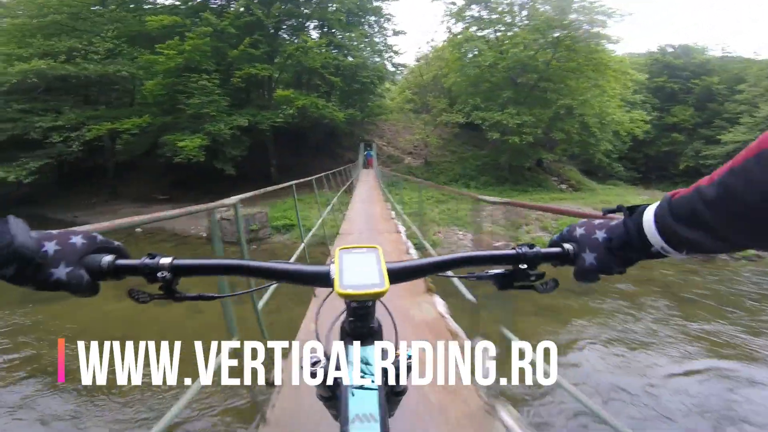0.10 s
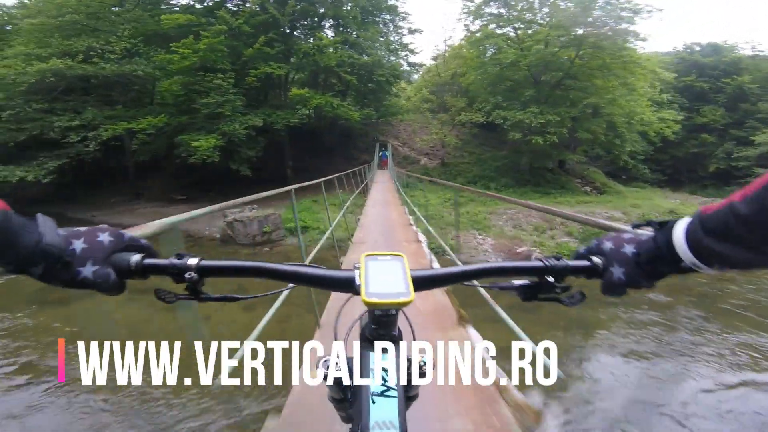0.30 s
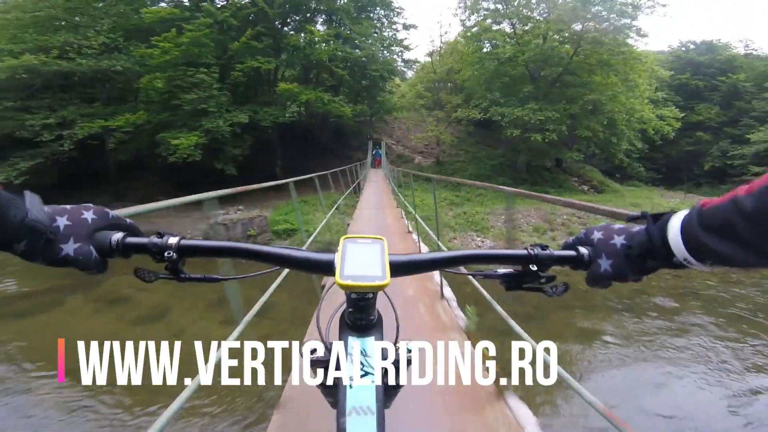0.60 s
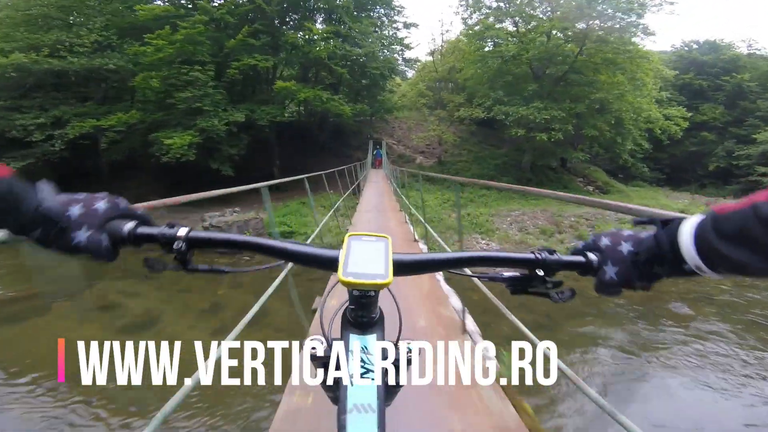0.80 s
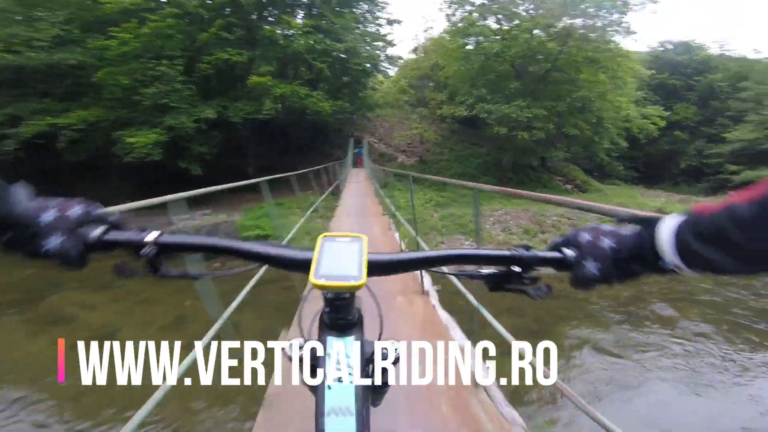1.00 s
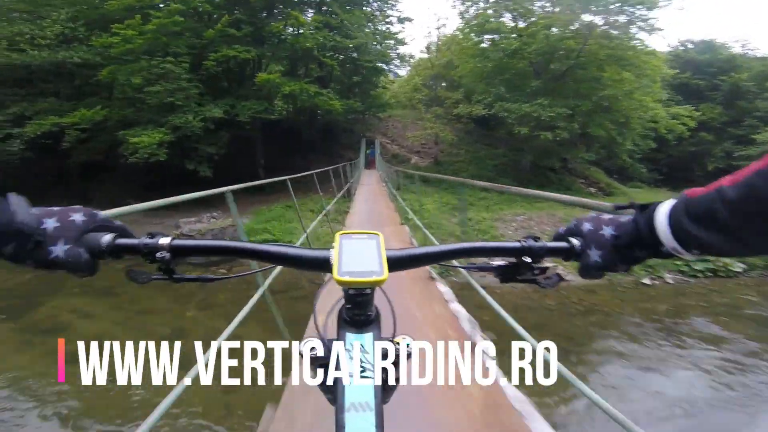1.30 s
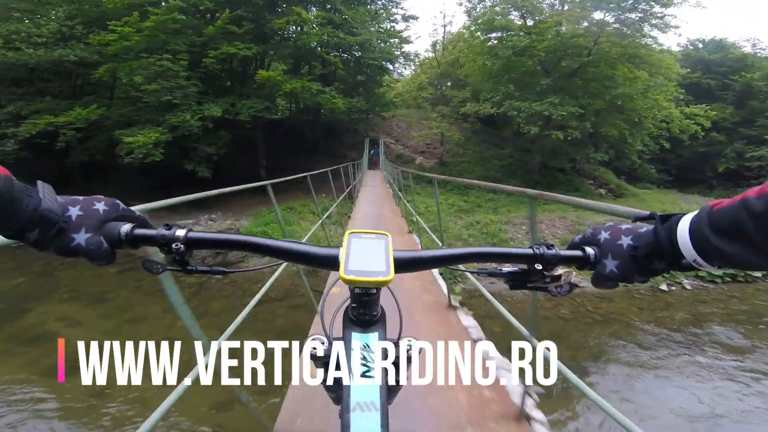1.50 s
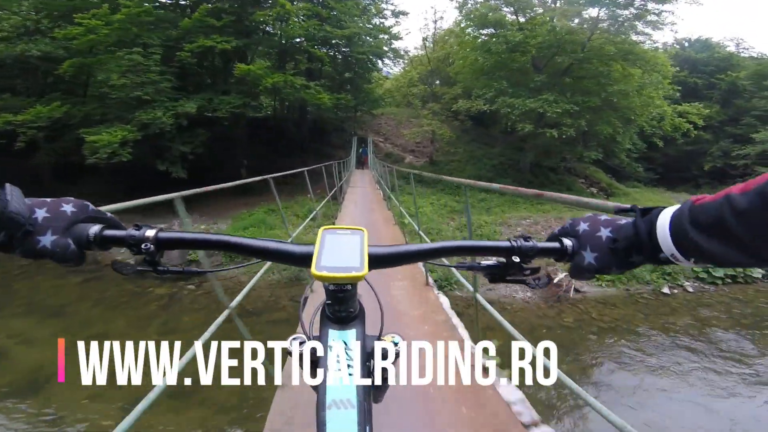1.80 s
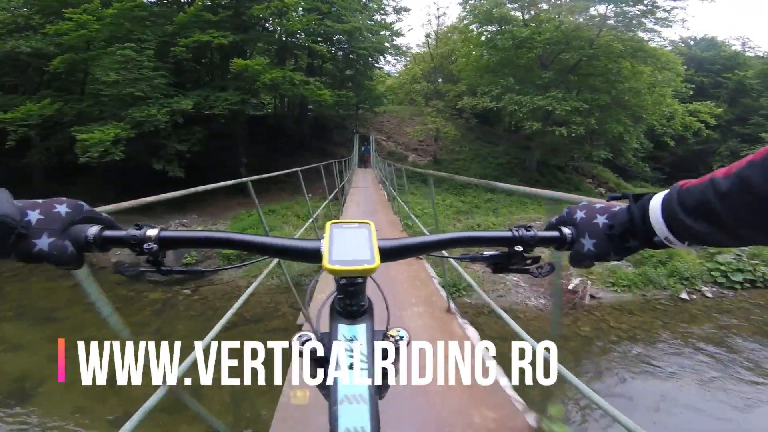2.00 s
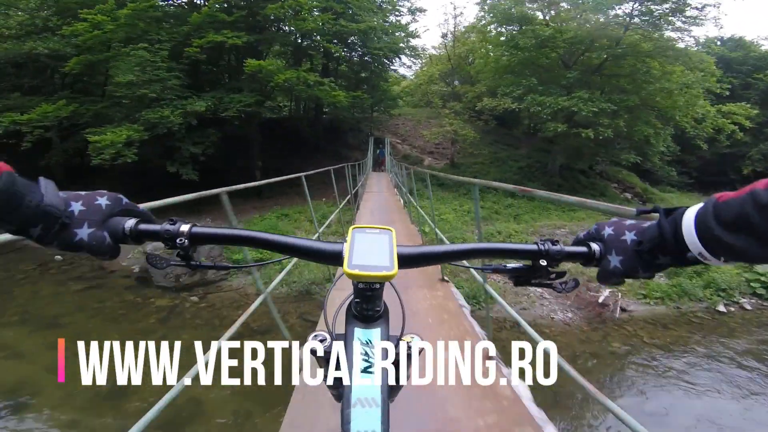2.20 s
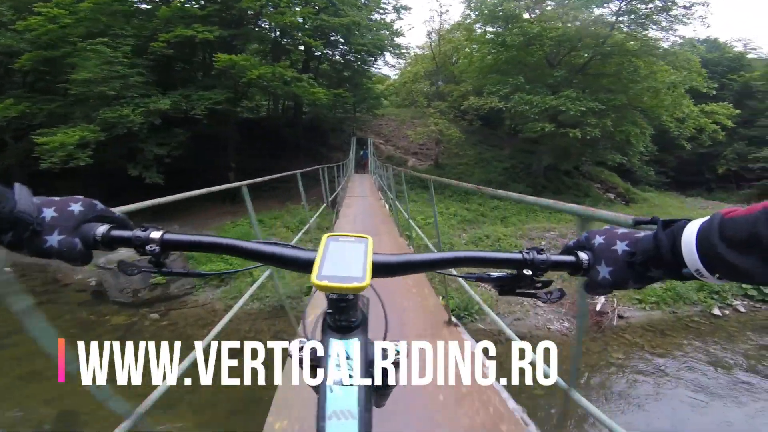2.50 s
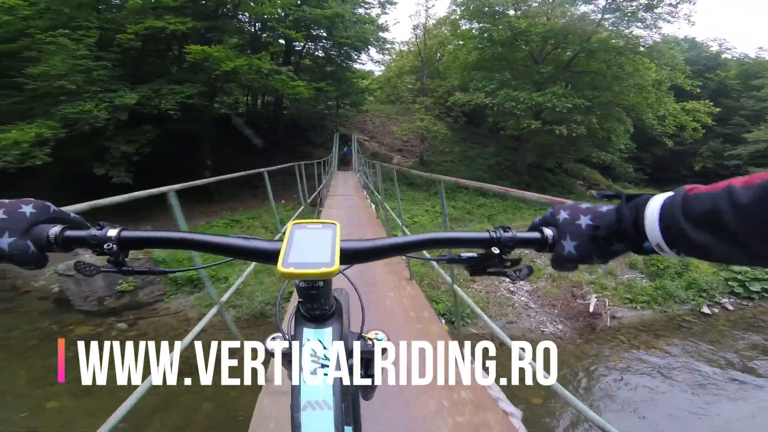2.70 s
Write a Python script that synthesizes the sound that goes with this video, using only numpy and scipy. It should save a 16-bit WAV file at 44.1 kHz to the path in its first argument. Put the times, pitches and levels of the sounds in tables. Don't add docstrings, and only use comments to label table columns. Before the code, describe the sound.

Bicycle rolling across a narrow metal bridge with ratcheting hub, boomy knocks and sharp rattles

```python
import sys
import numpy as np
from scipy import signal
from scipy.io import wavfile
from scipy.ndimage import uniform_filter1d

SR = 44100
rng = np.random.default_rng(int(sys.argv[2]) if len(sys.argv) > 2 else 0)


def materialize(psi):
    bounded = np.clip(np.atleast_2d(psi).T, -1, 1)
    quanta = np.round(bounded * 32767).astype(np.int16)
    wavfile.write(sys.argv[1], SR, quanta)


def attenuation_scalar(level_db):
    decades = np.asarray(level_db, float) / 20
    return 10 ** decades


N = 125685
T = np.arange(N) / SR

# frequency in Hz, level in dB.
HOUSING_TOP = [(5000, -25), (7400, 2), (9000, -0.5), (10500, -10.5), (11800, -27), (12800, -26),
               (14000, -22), (15500, -26)]


def evened(x):
    return x / np.sqrt(np.mean(x ** 2) + 1e-20)


def curve(points):
    return np.interp(T, *np.transpose(points))


def colour(x, points):
    f, db = np.transpose(points)
    hz = abs(np.fft.fftfreq(4096, 1 / SR)) + 1
    log_gain = np.log(attenuation_scalar(np.interp(np.log(hz), np.log(f), db)))
    spectrum = np.exp(np.conj(signal.hilbert(log_gain)))
    taps = np.fft.ifft(spectrum).real[:2048]
    return signal.oaconvolve(x, taps / np.linalg.norm(taps))[:N]


def resonate(x, table):
    out = 0
    for hz, width, db in table:
        r = np.exp(-np.pi * width / SR)
        w = 2 * np.pi * hz / SR
        out = out + attenuation_scalar(db) * signal.lfilter([1, -1], [1, -2 * r * np.cos(w), r * r], x)
    return out


def wander(per_s):
    size = max(int(SR / per_s), 1)
    drift = uniform_filter1d(rng.standard_normal(N), size)
    return evened(uniform_filter1d(drift, size))


def bursts(table, rise_s):
    power = 0
    for s, db, hold, t60 in table:
        t = T - s
        rise = np.clip(t / rise_s, 0, 1)
        power = power + (rise * attenuation_scalar(db - 60 * np.maximum(t - hold, 0) / t60)) ** 2
    return np.sqrt(power)


def hub():
    # time in seconds, teeth per second.
    tooth_rate = [(0, 55.42), (.135, 42.06), (.31, 40.2), (.357, 42.81), (.457, 30.16), (.506, 37.16),
                  (.802, 43.78), (1.019, 23.72), (1.095, 48.83), (1.173, 59.25), (1.257, 37.35),
                  (1.41, 42.87), (1.828, 38.52), (2.01, 45.17), (2.462, 36.1), (2.521, 25.9), (2.65, 42.56),
                  (2.85, 30.96)]
    # time in seconds, level in dB.
    loudness = [(0, -40.5), (.15, -43), (.3, -41.5), (.4, -40.5), (.5, -40.5), (.8, -50.5), (1.1, -47),
                (1.3, -46), (1.45, -45.5), (1.75, -45.5), (1.9, -41.5), (2.05, -45.5), (2.5, -43),
                (2.62, -46), (2.73, -42), (2.85, -43.5)]
    # frequency in Hz, width in Hz, level in dB.
    shell_ring = [(6567, 470, -34.5), (2230, 430, -38.5)]
    # frequency in Hz, level in dB.
    tone = [(900, -23), (2200, -4.5), (3300, -10), (4100, -17), (6500, 2), (7600, -11.5), (10000, -23),
            (12000, -49), (14200, -35)]
    spread_s, snap_t60_s = .0035, .02
    tail_db, tail_t60_s = -16, .08

    teeth = np.floor(-.06 + np.cumsum(curve(tooth_rate)) / SR)
    passed = (np.diff(teeth, prepend=teeth[0]) > 0) * (teeth >= 0)
    snaps = passed * attenuation_scalar(2 * wander(120))
    t = T[:4000]
    cluster = attenuation_scalar(-60 * np.maximum(t - spread_s, 0) / snap_t60_s)
    cluster = cluster + attenuation_scalar(tail_db - 60 * t / tail_t60_s)
    scrape = signal.oaconvolve(snaps, cluster)[:N] * rng.standard_normal(N)
    drive = (scrape + attenuation_scalar(14) * snaps) * attenuation_scalar(curve(loudness))
    return colour(drive + resonate(drive, shell_ring), tone)


def chatter():
    sizes = attenuation_scalar(2.2 * np.minimum(rng.exponential(1, N), 4)) * rng.choice([-1., 1.], N)
    clicks = evened(sizes * (rng.random(N) < 2000 / SR))
    grains = clicks + .8 * rng.standard_normal(N)
    return evened(grains * attenuation_scalar(1.6 * wander(300)))


def rattle():
    # start in seconds, level in dB, hold in seconds, t60 in seconds,
    # extra level in the frame in dB.
    shakes = [(0.247, -33.5, 0.0093, 0.12, 7), (0.409, -39.5, 0.0075, 0.12, 1.5),
              (0.527, -38, .004, .1, -10), (0.531, -26.5, 0.013, 0.098, 1.5),
              (0.562, -22.5, 0.0044, 0.16, 0.5), (0.614, -28, 0.0092, 0.19, 3),
              (0.638, -42, 0.012, 0.51, 7.5), (0.774, -45.5, 0.015, 0.12, 7),
              (1.006, -43.5, 0.0058, 0.084, 7), (0.846, -44.5, 0.022, 0.14, 4.5),
              (.888, -37, 0.018, 0.16, 5.5), (0.965, -36, 0.0082, 0.098, 2.5),
              (1.04, -40.5, 0.0069, 0.13, 3.5), (1.143, -43.5, 0.011, 0.12, 4.5),
              (1.4625, -28, .002, 0.028, -13), (1.463, -30.5, 0.025, 0.29, 3), (1.586, -41, 0.026, 0.12, 4),
              (1.611, -24.5, 0.0059, 0.17, 1), (1.683, -26.5, 0.006, 0.18, 1), (1.77, -46, 0.024, 0.31, 6),
              (1.856, -49, 0.034, 0.19, 4.5), (2.049, -42, .003, 0.029, -6), (2.061, -43.5, 0.009, 0.11, 2),
              (2.093, -37, 0.0025, .03, 1.5), (2.092, -28.5, 0.01, 0.26, 2), (2.145, -33, 0.044, 0.43, 0.5),
              (2.221, -35.5, 0.0067, 0.33, 0.5), (2.299, -39.5, 0.045, 0.41, 4)]
    # frequency in Hz, level in dB.
    chamber = [(3500, -42), (4400, -11), (4900, 2.5), (5700, 5.5), (6100, 3), (6500, 7), (7100, -11),
               (8800, -58)]
    # frequency in Hz, level in dB.
    frame_tone = [(300, -6), (700, 4), (1500, 3.5), (3000, 8), (4200, 4.5), (5500, -5), (8000, -12),
                  (11500, -44)]
    # frequency in Hz, width in Hz, level in dB.
    mount_ring = [(5770, 190, 0)]
    # start in seconds, level in dB, hold in seconds, t60 in seconds.
    mount_shakes = [
        (2.147, -30.5, 0.039, 0.13),
    ]
    rise_s = .0008

    level = bursts([row[:4] for row in shakes], rise_s)
    frame_rows = [(s, db + share_db, hold, t60) for s, db, hold, t60, share_db in shakes]
    frame_level = bursts(frame_rows, rise_s)
    clicks = chatter()
    faster = (level / attenuation_scalar(-32.5)) ** (1.35 - 1)
    top = colour(clicks * level * faster, HOUSING_TOP)
    body = colour(chatter() * frame_level, frame_tone)
    singing = evened(resonate(resonate(clicks, mount_ring), mount_ring))
    loose = singing * bursts(mount_shakes, rise_s)
    return colour(clicks * level, chamber) + loose + attenuation_scalar(-11) * top + attenuation_scalar(-8.5) * body


def ticks():
    # time in seconds, peak in dB.
    blows = [(0.2515, -4), (0.2917, -17), (0.3904, -16), (0.4179, -12), (0.5291, -12), (0.5357, 5),
             (0.5432, 3), (0.5539, 1), (0.5639, 12.5), (0.5674, -11), (0.5707, 6), (0.5785, -10),
             (0.5933, -17), (0.6175, 11.5), (0.6211, -15), (0.628, -8), (0.6449, 2), (0.6493, -4),
             (0.8976, -21), (0.9027, -17), (0.9691, -12), (1.0454, -15), (1.4639, -16), (1.4685, -19),
             (1.4801, -16), (1.4848, -3), (1.4908, -9), (1.6145, 1), (1.6199, -6), (1.6296, -10),
             (1.6331, -14), (1.639, -12), (1.6555, -18), (1.6856, -9), (1.6924, 3), (1.6963, -14),
             (1.7024, -15), (1.7058, -16), (1.7165, -6), (2.096, -17), (2.1001, -20), (2.1033, -16),
             (2.107, -22), (2.1122, -19), (2.1246, -13), (2.1287, -13), (2.1463, -13), (2.1521, -4),
             (2.1574, -8), (2.1729, 1), (2.1811, 1), (2.1879, -2), (2.1942, -11), (2.2008, -9),
             (2.2139, -9), (2.2258, -17)]
    # frequency in Hz, width in Hz, level in dB.
    housing_ring = [(5600, 370, 12.5), (6650, 960, 20.5), (5350, 500, -17), (8900, 1300, -25),
                    (3000, 1500, -33)]
    rise_s, blow_hz, hz_spread = 0.00068, 5850, .07
    knock_s, knock_db = 0.2491, -17.5

    hits, blow, knock = np.zeros(N), np.zeros(N), np.zeros(N)
    t = T[:200]
    u = t / rise_s
    swell = u * np.exp(-u * u * 2)
    for (s, db), bend in zip(blows, rng.standard_normal(len(blows))):
        at = round(s * SR)
        hits[at] = attenuation_scalar(db - 15)
        hz = blow_hz * (1 + hz_spread * bend)
        blow[at:at + len(u)] += hits[at] * swell * np.sin(2 * np.pi * hz * t)
    for late_s, db in [(0, -0.5), (.0023, -33), (.0041, -4.5), (.0066, -29)]:
        knock[round((knock_s + late_s) * SR)] = -attenuation_scalar(knock_db + db)
    soft = uniform_filter1d(uniform_filter1d(knock, size=6), size=6)
    dull = resonate(soft, [(1060, 730, 10), (1600, 300, -4)])
    ring = attenuation_scalar(-27.5) * resonate(blow, housing_ring)
    ring = ring + attenuation_scalar(-37) * resonate(uniform_filter1d(hits, size=3), housing_ring)
    return ring + attenuation_scalar(-18) * colour(hits, HOUSING_TOP) + dull


def deck():
    # start in seconds, level in dB, hold in seconds, t60 in seconds.
    thuds = [(0.25, -39.5, 0.063, 0.37), (0.534, -29, 0.014, 0.74), (0.627, -49, 0.16, 0.49),
             (0.722, -42.5, 0.067, 0.29), (0.888, -45, 0.025, 0.75), (1.037, -43, 0.016, 0.12),
             (1.144, -38, 0.014, 0.34), (1.473, -32.5, 0.033, 0.55), (1.597, -31, 0.025, 0.41),
             (1.685, -35.5, 0.015, 0.64), (2.093, -32, 0.071, 1), (2.213, -38, 0.063, 0.48),
             (2.298, -42, 0.056, 0.18)]
    # frequency in Hz, width in Hz, level in dB.
    deck_ring = [(42.3, 36, -1.5), (102, 31, -3), (165, 89, 8), (276, 44, 2.5), (450, 90, -18),
                 (900, 900, -30)]
    # start in seconds, level in dB, hold in seconds,
    # t60 in seconds.
    span_booms = [(0, -50.5, 0.091, .6), (.23, -35, 0.065, 0.45), (.43, -34, 0.023, 0.14),
                  (.56, -41, 0.23, 0.31), (.9, -52, 0.19, 1), (1.48, -36, 0.035, 0.47),
                  (1.6, -34.5, 0.14, 0.49), (1.72, -48, 0.05, 0.4), (1.88, -41.5, .08, 0.24),
                  (2.1, -41, 0.087, 0.47), (2.3, -36, 0.028, 0.14), (2.55, -45.5, 0.18, 1)]
    # time in seconds, level in dB.
    tyre_load = [(0.0, -38.5), (0.67, -39), (1.28, -40), (1.5, -43), (1.65, -39.5), (1.98, -39.5),
                 (2.23, -38.5), (2.85, -40)]
    # frequency in Hz, width in Hz, level in dB.
    tyre_ring = [(100, 42, 1.5), (147, 90, -1.5), (249, 140, -7), (540, 610, -14)]
    span_ring = [(93.6, 28, 0)]  # Hz, width Hz, dB

    blows = np.zeros(N)
    for s, db, hold, t60 in thuds:
        blows[round(s * SR)] = attenuation_scalar(db + 3)
    push = np.hanning(round(.002 * SR))
    soft = signal.oaconvolve(blows, push / push.sum())[:N]
    shake = evened(resonate(rng.standard_normal(N), deck_ring)) * bursts(thuds, 0.00099)
    shake = shake + resonate(soft, deck_ring)
    hum = evened(resonate(resonate(rng.standard_normal(N), span_ring), span_ring))
    boom = hum * bursts(span_booms, 0.014)
    knobs = rng.standard_normal(N) * attenuation_scalar(wander(84))
    roll = evened(resonate(knobs, tyre_ring)) * attenuation_scalar(-2 + curve(tyre_load))
    heavy = signal.butter(3, 2920, fs=SR, output="sos")
    return signal.sosfilt(heavy, shake + boom + roll)


def thumps():
    # start in seconds, peak in dB, frequency in Hz, hold in seconds,
    # t60 in seconds.
    sags = [(0.53, -38, 43, .035, 0.12), (1.499, -38, 50, .02, .12), (1.594, -37, 86.5, 0.028, 0.16),
            (2.089, -27, 54, 0.061, .12), (2.092, -28.5, 95, 0.032, 0.14), (2.145, -28, 95, 0.075, 0.5),
            (.535, -45, 284, 0.015, 0.14), (.6, -35.5, 149.6, 0.057, 0.38),
            (.69, -41.5, 186.5, 0.084, 0.34), (0.758, -44.5, 286, 0.028, 0.24),
            (1.028, -37.5, 302, 0.013, 0.12), (1.145, -39, 60.5, 0.023, .15),
            (1.472, -34, 292.5, 0.029, 0.19), (1.615, -44, 291, 0.026, 0.22), (1.788, -41, 287, .03, .2),
            (2.146, -34, 230, 0.023, .2), (2.29, -38, 197.6, 0.056, 0.23), (2.299, -31.5, 113, 0.045, 0.14)]
    out = 0
    for s, db, hz, hold, t60 in sags:
        out = out - bursts([(s, db, hold, t60)], 0.0025) * np.sin(2 * np.pi * hz * (T - s))
    return out


def air():
    # time in seconds, level in dB.
    wind_level = [(0, -46), (.5, -42), (1.3, -46.5), (1.5, -46), (2.0, -49), (2.12, -54), (2.3, -39.5),
                  (2.85, -43)]
    # frequency in Hz, level in dB.
    river_tone = [(400, 4.5), (1000, 5), (2300, 2.5), (4200, -4), (5700, 4.5), (7500, -1), (10000, -15.5),
                  (12700, -28)]
    # time in seconds, level in dB.
    river_level = [(0, -47), (.3, -47.5), (.8, -55.5), (1.3, -53), (1.9, -51.5), (2.45, -51.5), (2.85, -52)]

    band = signal.butter(2, [18, 55.4], "band", fs=SR, output="sos")
    low = signal.sosfilt(band, rng.standard_normal(N))
    wind = evened(low) * attenuation_scalar(curve(wind_level) + 1.2 * wander(5.1))
    hiss = colour(rng.standard_normal(N), [(150, -7)] + river_tone + [(14000, -58)])
    return wind + hiss * attenuation_scalar(curve(river_level) + .7 * wander(2.8))


def scene():
    return (hub() + rattle() + deck() + thumps() + air() + ticks())[None]


def band_limit(x):
    return signal.sosfilt(signal.butter(12, 15810, fs=SR, output="sos"), x)


def record(dry):
    low_cut = signal.butter(2, 29.7, "high", fs=SR, output="sos")
    top_cut = signal.butter(2, 15000, fs=SR, output="sos")
    edge = signal.firwin(511, 15800, window=("kaiser", 9), fs=SR)
    x = dry + attenuation_scalar(-88) * rng.standard_normal(dry.shape)
    x = signal.sosfilt(top_cut, signal.sosfilt(low_cut, x))
    x = signal.oaconvolve(x, edge[None], "same")
    return band_limit(x)


dry = scene()
out = record(dry)
materialize(out)
```